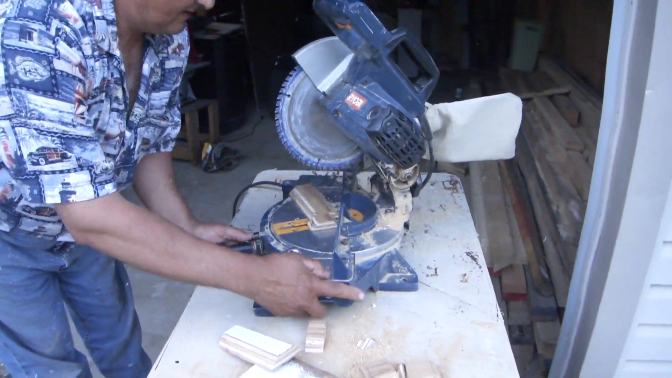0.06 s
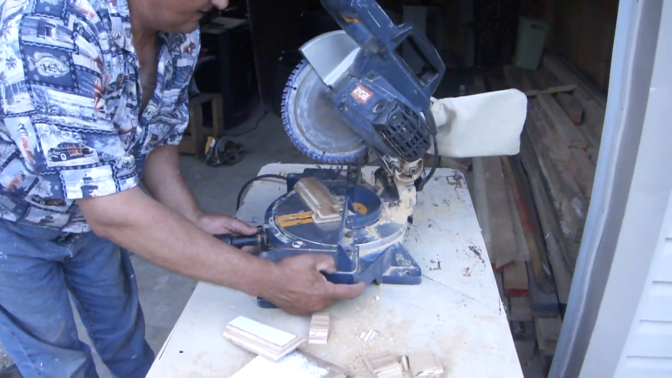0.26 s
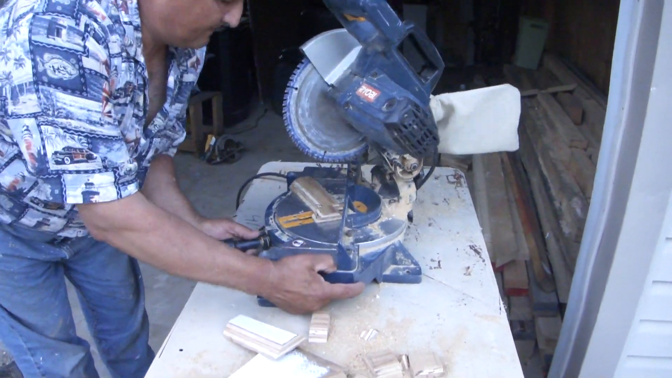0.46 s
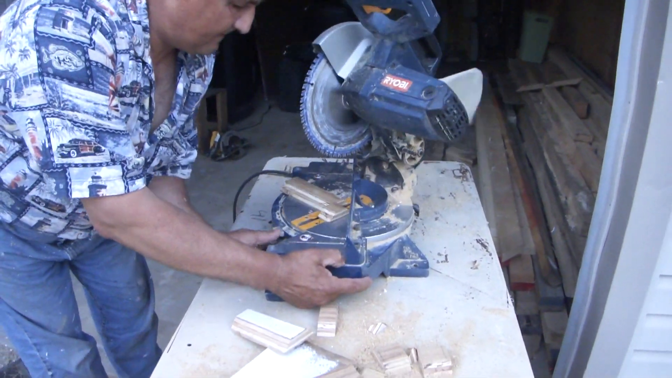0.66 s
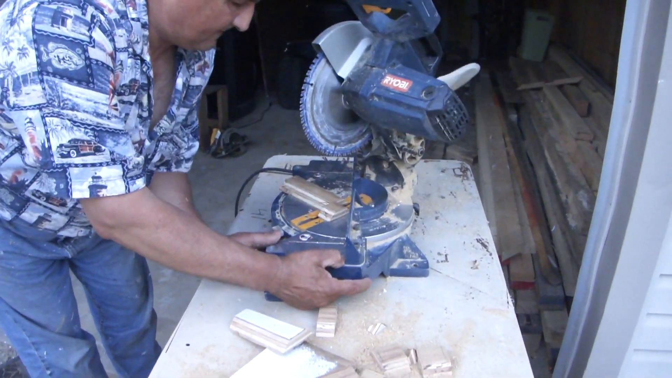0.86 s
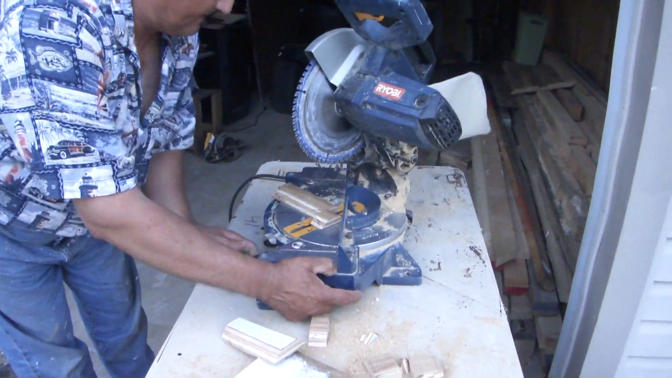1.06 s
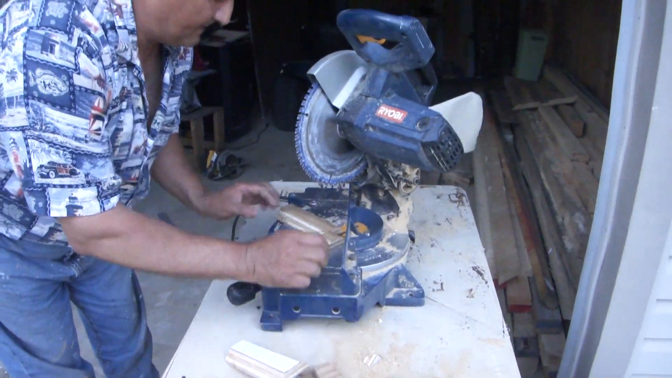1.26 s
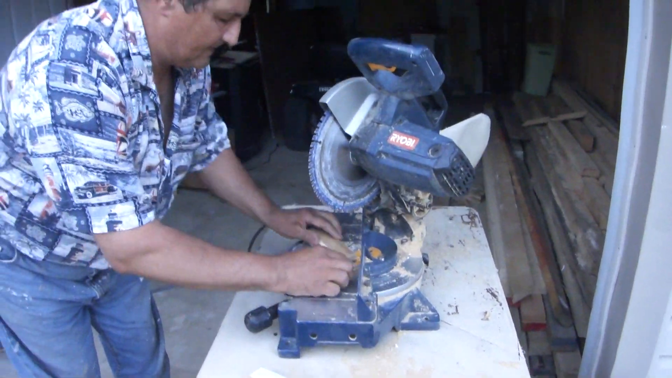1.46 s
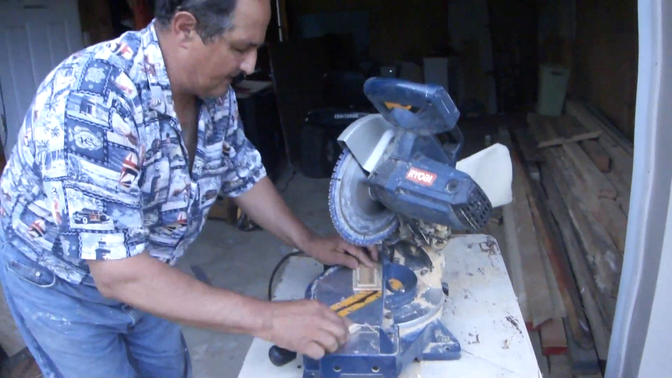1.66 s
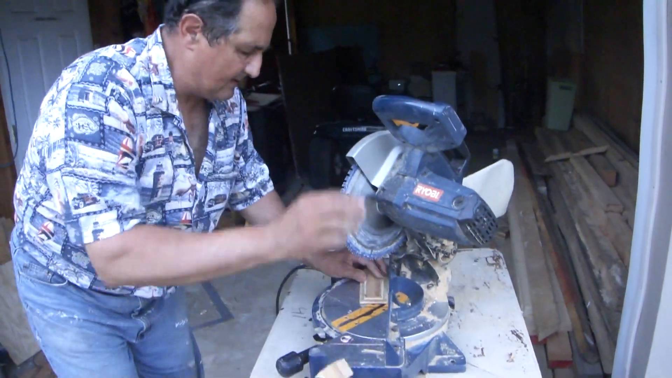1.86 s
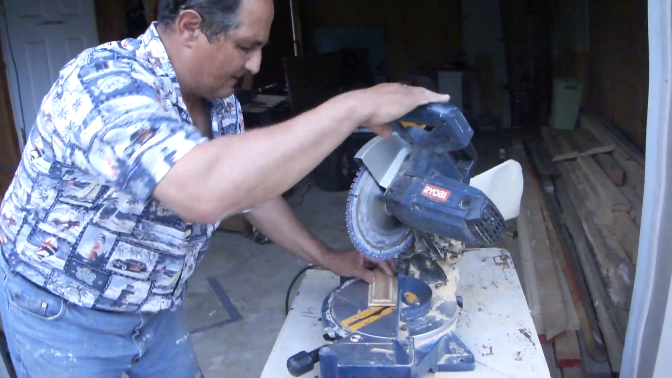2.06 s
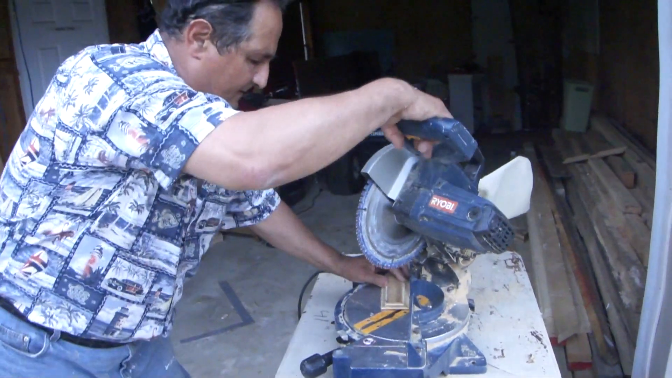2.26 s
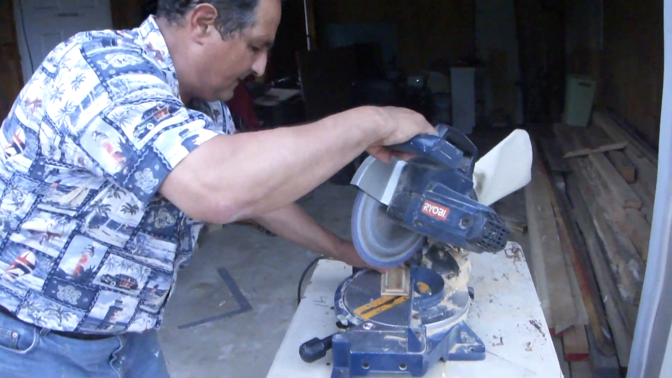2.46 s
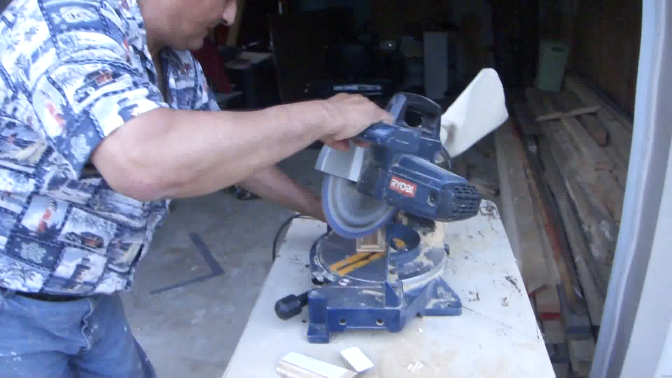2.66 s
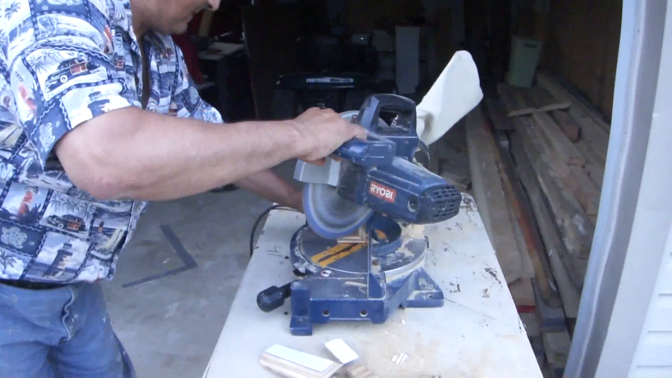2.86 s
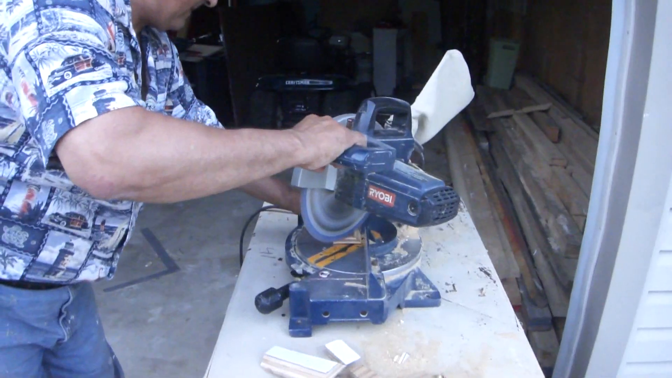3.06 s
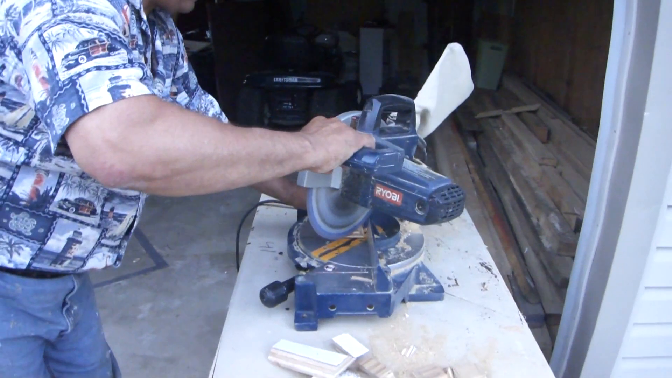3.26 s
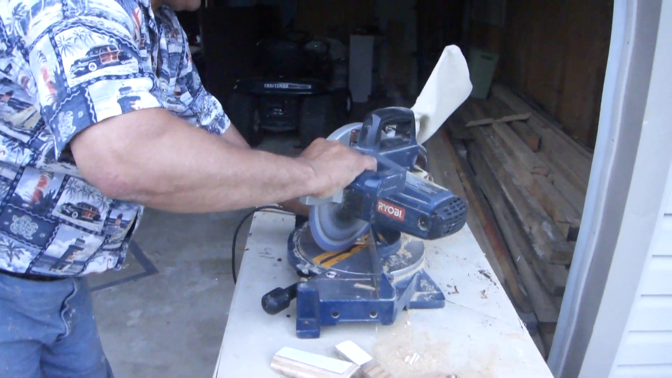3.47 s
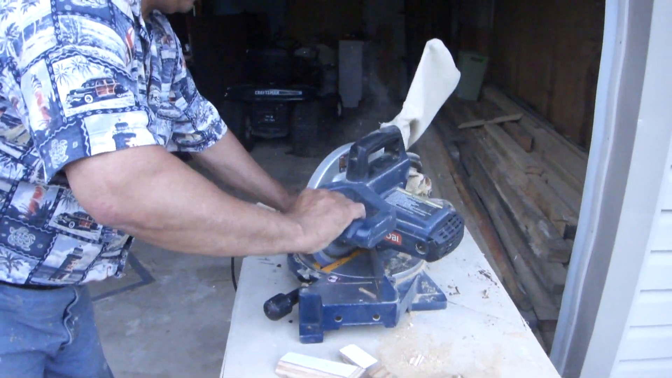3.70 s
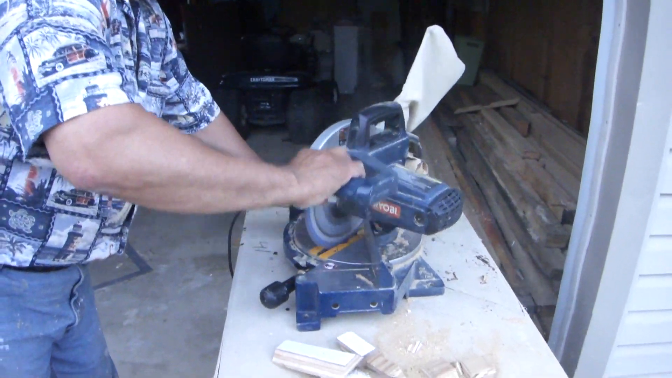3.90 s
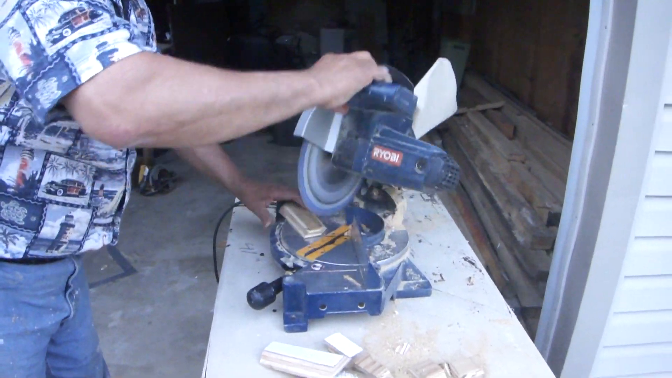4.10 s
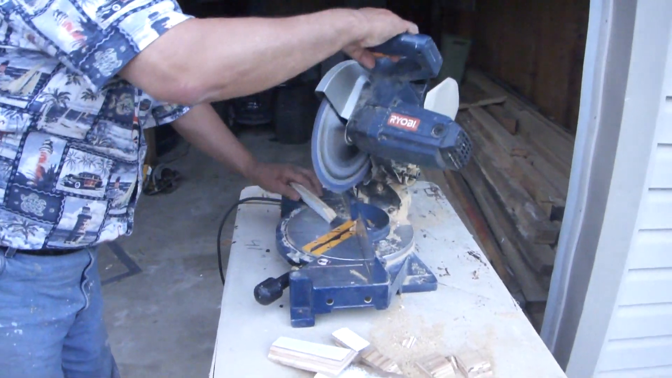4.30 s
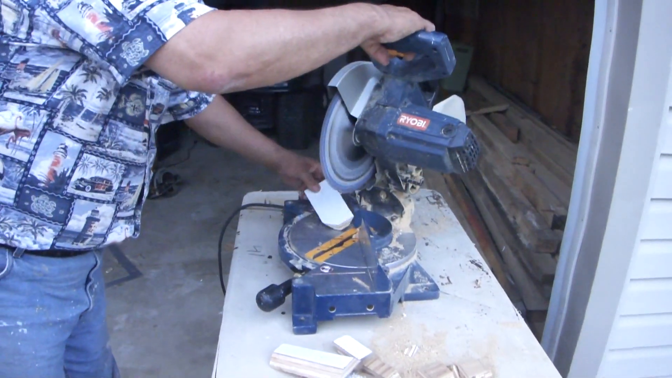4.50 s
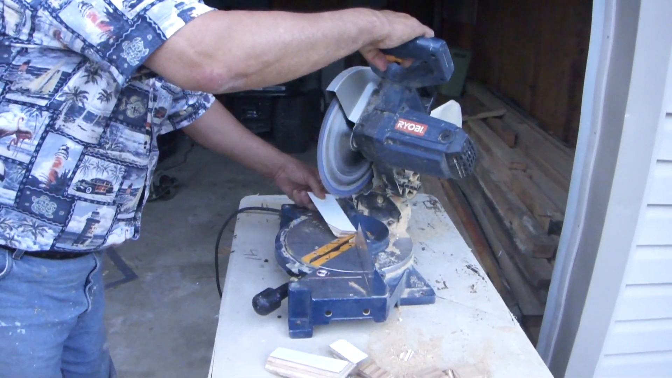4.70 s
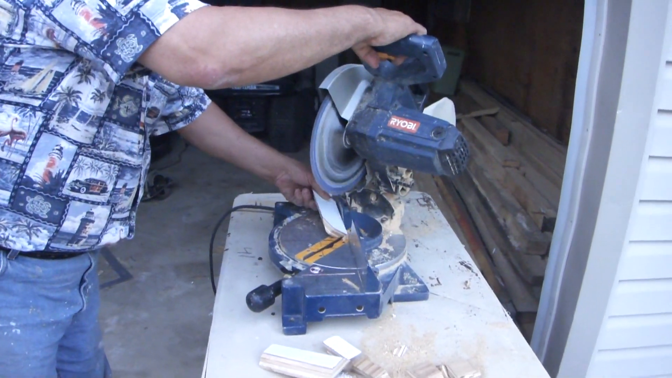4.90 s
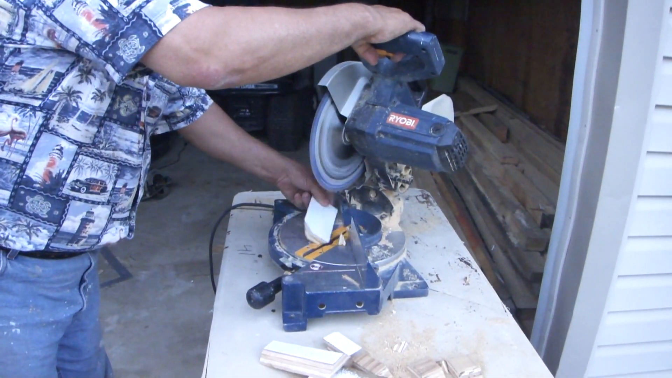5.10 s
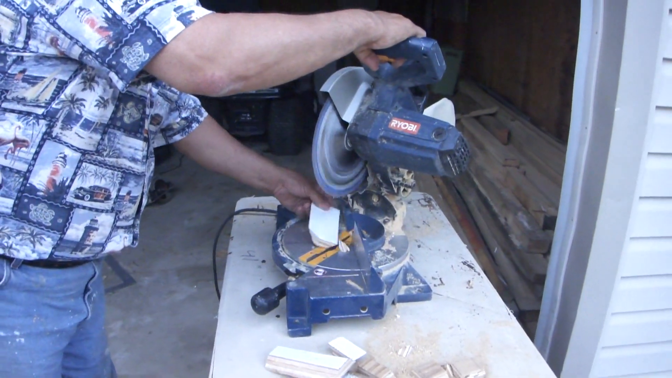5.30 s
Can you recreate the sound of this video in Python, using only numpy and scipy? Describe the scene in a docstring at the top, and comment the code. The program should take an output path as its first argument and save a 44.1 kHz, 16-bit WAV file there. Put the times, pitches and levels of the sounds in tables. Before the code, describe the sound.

Close by at a bench in an open garage, a miter saw's table scrapes round and clicks, and a wooden block is slid and knocked into place over a soft rush. The motor jolts on and whines up to speed, then the teeth rasp briefly through the wood. Switched off with a sharp click, the saw coasts down, its blade ringing with a slowing flutter, and the wood knocks once more.

```python
"""A soft workshop rush, then knocks and scrapes, close to a stereo pair at a bench in an open garage.
A miter saw's table is swung round and a wooden block is slid and knocked into place. The motor starts
with a jolt, gears and fan whine up to speed, and the teeth rasp through the block. Switched off, the saw
coasts down while its steel blade rings on with a slowing flutter. The recorder's gain control pushes
the room down under the saw and lets it back up as the saw slows."""
import sys
import numpy as np
from scipy import signal
from scipy.fft import rfft, irfft
from scipy.io import wavfile
from scipy.ndimage import uniform_filter1d

SR = 44100
rng = np.random.default_rng(int(sys.argv[2]) if len(sys.argv) > 2 else 0)


def dump(signal):
    """Clip the signal to [-1, 1] and save it as 16-bit WAV at the path in sys.argv[1]."""
    limited = np.clip(np.atleast_2d(signal).T, -1, 1)
    pcm = np.round(limited * 32767).astype(np.int16)
    wavfile.write(sys.argv[1], SR, pcm)


N = 235798
TIME = np.arange(N) / SR
GEAR_TEETH, PINION_TEETH, MAINS_HZ = 29, 8, 60
TOP_SPEED = 73.3  # blade turns per second
CATCH_S, SWITCH_ON_S, SWITCH_OFF_S = 0.7325, 2.468, 3.91
BITE_S, THROUGH_S = 3.41, 3.7  # the wood loads the motor between these times


def amp(db):
    """Decibels to gain."""
    return 10 ** (np.asarray(db) / 20)


def gate(start, end, fade):
    """One between two times, with straight fades outside them (all in s)."""
    return np.clip(np.minimum(TIME - start, end - TIME) / fade + 1, 0, 1)


def swell(peak_s, rise_db_per_s, fall_db_per_s):
    """Gain that climbs to one at a given time and dies away after it."""
    return amp(np.minimum((TIME - peak_s) * rise_db_per_s, (peak_s - TIME) * fall_db_per_s))


def bump(peak_s, width_s):
    """Bell curve of height one."""
    return np.exp(-((TIME - peak_s) / width_s) ** 2)


def unit(x):
    """Scale to rms 1."""
    return x / np.sqrt(np.mean(x ** 2))


def band(x, lo_hz, hi_hz):
    """Steep band-pass."""
    return signal.sosfilt(signal.butter(4, [lo_hz, hi_hz], "band", fs=SR, output="sos"), x)


def steady(x, lo_hz, hi_hz):
    """Scale so that the given band holds rms 1 from moment to moment."""
    power = uniform_filter1d(band(x, lo_hz, hi_hz) ** 2, size=4000)
    return x / np.sqrt(np.abs(power) + 1e-12)


def colour(x, spectrum, peaks=(), size=4096):
    """Causal filter from (f/Hz, level/dB) points plus (f/Hz, width/Hz, gain/dB) resonances."""
    f = np.fft.rfftfreq(size, 1 / SR) + 1
    hz, db = np.transpose(spectrum)
    db = np.interp(np.log(f), np.log(hz), db)
    db += sum(gain / (1 + (2 * (f - centre) / width) ** 2) for centre, width, gain in peaks)
    cepstrum = irfft(np.log(amp(db)))[:size // 2]
    cepstrum[1:] *= 2  # minimum phase
    return signal.fftconvolve(x, irfft(np.exp(rfft(cepstrum, size))))[:len(x)]


def walk(rate):
    """Smooth random wander of rms 1, taking `rate` steps a second."""
    hold = int(SR / rate)
    steps = np.repeat(rng.standard_normal(N // hold + 1), hold)
    return unit(uniform_filter1d(uniform_filter1d(steps, hold), hold)[:N])


def impacts(hits, spread_db):
    """An impulse of random size at each marked sample; rms 1 overall."""
    return unit(hits * rng.standard_normal(N) * amp(spread_db * rng.standard_normal(N)))


def grains(rate, spread_db=1):
    """Tiny impacts at random times, `rate` a second on average."""
    return impacts(rng.random(N) < rate / SR, spread_db)


def strikes(cycles, spread_db):
    """One impact at each whole cycle."""
    return impacts(np.diff(np.floor(cycles), prepend=0), spread_db)


def tones(turns, rough, flutter_hz, orders=((1, 0),)):
    """Overtones (multiple, level/dB) of a rotation; roughness (0-1) smears each into a narrow band."""
    out = 0
    for order, db in orders:
        flutter = (walk(flutter_hz) + 1j * walk(flutter_hz)) / np.sqrt(2)
        carrier = np.exp(2j * np.pi * (order * turns + rng.random()))
        out += amp(db) * np.real((np.sqrt(1 - rough ** 2) + rough * flutter) * carrier)
    return np.sqrt(2) * out


def workshop():
    """Room tone: a soft, steady rush with faint machine tones, nearly the same at both capsules."""
    # spectrum of the rush: f/Hz, level/dB
    room_spectrum = [(18, -21), (30, -24.5), (159, -4.5), (384, -10.5), (470, -5.5), (520, -10),
                     (620, -4.5), (778, -9), (929, -4), (1080, -8.5), (1320, -6), (2190, -15),
                     (3200, -19.5), (3820, -25.5), (12500, -41.5), (16200, -83), (22000, -120)]
    # machine tones: f/Hz, level/dB
    machines = [(167.3, -48.5), (597, -49), (120, -50.5)]
    mid, side = (unit(colour(rng.standard_normal(N), room_spectrum)) for _ in range(2))
    rush = mid * amp(0.08 * walk(7.1)) + 0.39 * side * np.array([[1], [-1]])
    hum = sum(amp(db) * tones(hz * TIME, rough=0.72, flutter_hz=12) for hz, db in machines)
    return amp(-34.5) * rush + hum


def garage(x, t60=0.32, early_t60=0.08, wet_db=-11, side_db=-15):
    """Bench and walls reflect: a short tail common to both capsules and early echoes that differ."""
    t = TIME[:SR // 2]
    tail, early = (rng.standard_normal(len(t)) * amp(-60 * t / decay) * (t > 0.003)
                   for decay in (t60, early_t60))
    tail = colour(tail, [(100, -1), (1500, 3.5), (5000, 1), (12000, 4.5)])
    tail /= np.sqrt(SR * t60 / np.log(1e6))  # divide out the decay's energy
    early /= np.linalg.norm(early)
    early = colour(early, [(100, 6), (2500, -10), (5000, 2), (8500, 8), (12000, 3)])
    mid = x + amp(wet_db) * signal.fftconvolve(x, tail)[:N]
    side = amp(side_db) * signal.fftconvolve(x, early)[:N]
    return mid + side * np.array([[1], [-1]])


def table_swing():
    """The gritty saw table sticks and slips as it creeps, runs free past its catch and comes to rest."""
    # spectrum of the scrape: f/Hz, level/dB
    scrape_spectrum = [(88, -44), (150, -11), (292, -11.5), (509, -3.5), (697, -17), (823, -2), (886, -4.5),
                       (1490, -7), (2000, -13.5), (2200, -9.5), (4040, -20), (10400, -28.5), (12500, -37),
                       (16200, -75), (22000, -120)]
    start_s = 0.577
    creep = amp(-29.5 + 15 * (TIME - start_s)) * gate(start_s, CATCH_S, fade=0.031)
    free_run = amp(-11.5) * swell(0.7577, rise_db_per_s=354, fall_db_per_s=199)
    grit = grains(rate=1800) + 0.5 * rng.standard_normal(N)
    scrape = colour(grit, scrape_spectrum, peaks=[(534, 140, 1.6), (800, 58, 3.3), (1490, 100, 5.7)])
    return unit(scrape) * np.hypot(creep, free_run)


def catch():
    """The table's steel catch snaps over a notch and rings briefly."""
    # modes of the catch: f/Hz, level/dB, t60/s
    modes = [(3220, -7.5, 0.034), (3580, -14, .03), (5020, -11.5, 0.03), (7500, -35, 0.022)]
    t = np.maximum(TIME - CATCH_S, 0)
    return sum(amp(db - 60 * t / t60) * np.sin(2 * np.pi * hz * t) for hz, db, t60 in modes)


def block_slide(release_db_per_s=167):
    """Wood fibres hiss and squeak on the table as the block is slid to the fence."""
    # pushes of the block: t/s, length/s, level/dB
    pushes = [(1.107, 0.13, -39.5), (1.538, 0.018, -38), (1.604, 0.18, -37), (2.146, 0.016, -35)]
    # spectrum of the sliding wood: f/Hz, level/dB
    hiss_spectrum = [(710, -39), (1200, 1), (2930, -4), (4010, -11.5), (4740, -7), (5430, -10),
                     (7290, -6.5), (9690, -13), (12500, -22), (16200, -57), (22000, -120)]
    # squeaks of the wood: t/s, f/Hz, level/dB
    squeaks = [(1.548, 9950, -46), (1.71, 7340, -35), (1.775, 9700, -38.5)]
    motion = 0
    for s, length, db in pushes:
        release_db = release_db_per_s * np.maximum(TIME - s - length, 0)
        motion += amp(db - release_db) * gate(s, np.inf, fade=0.014)
    fibres = grains(rate=2200, spread_db=2) * amp(3.2 * walk(59.7))
    resonances = [(2060, 180, 3.5), (5040, 250, 4.2), (7370, 400, 3), (9900, 410, 2.8)]
    out = unit(colour(fibres, hiss_spectrum, resonances)) * motion
    for s, hz, db in squeaks:
        out += amp(db) * bump(s, width_s=0.012) * tones(hz * TIME, rough=0.95, flutter_hz=600)
    return out


def knocks(crack_t60=0.042, tick_t60=0.017, thud_trim_db=3, tick_trim_db=-2):
    """Each blow rings the block's modes, with a short crack and a bright tick at the contact."""
    # blows of wood and saw parts: t/s, thud/dB before trim, crack/dB, tick/dB before trim, pitch factor
    blows = [(0.09, -28, -48, -33.5, 0.78), (.504, -25.5, -26, -46, 0.77), (.664, -22, -26, -44, 1.27),
             (.733, -13, -19, -4.5, 1.4), (.757, -18, -13, -32, 1.2), (0.821, -10, -18, -43, 1.5),
             (.856, -20.5, -19, -47, 0.83), (1.1356, -11, -7.5, -40, 1.08), (1.215, -22, -28, -41, 0.92),
             (1.237, -24, -24.5, -30, 1.05), (1.522, -25.5, -30, -26.5, .8),
             (2.0648, -4.5, -7.5, -25, 0.85), (2.156, -9.5, -18, -22.5, 0.81),
             (2.173, -13.5, -24, -25, 0.99), (2.3502, -11.5, -23, -40, 0.88), (2.471, -11, -23, -10, 1.17),
             (2.48, -11, -11, -24, 1.01), (3.912, -8, -10, 2.5, 1), (4.676, -3, -7.5, -13, 1.76)]
    # modes of the block on the saw table: f/Hz, level/dB, t60/s
    modes = [(266.6, -9, 0.15), (398.5, -3.5, 0.15), (523, -2, .17), (607, -1.5, 0.18), (704, 4.5, 0.074),
             (838, 1, 0.083), (960, 3.5, 0.066), (1155, -3.5, 0.11), (1385, -6.5, 0.06)]
    # spectra of the contact: f/Hz, level/dB
    crack_spectrum = [(40, -34), (300, -2.5), (900, 6.5), (1900, 3.5), (3200, -8.5), (5000, -20),
                      (8000, -29.5), (12000, -44)]
    tick_spectrum = [(100, -60), (1500, -34), (3400, 1.5), (5000, 5.5), (7500, -7), (10000, -2),
                     (12500, -23)]
    out = np.zeros(N + SR)
    t = TIME[:SR // 3]
    for s, thud_db, crack_db, tick_db, pitch in blows:
        tuning = pitch * (1 + 0.021 * rng.standard_normal(len(modes)))
        thud = sum((-1) ** k * amp(db - 60 * t / t60) * np.sin(2 * np.pi * hz * tuning[k] * t)
                   for k, (hz, db, t60) in enumerate(modes))
        crack = unit(colour(rng.standard_normal(len(t)), crack_spectrum))
        tick = unit(colour(rng.standard_normal(len(t)), tick_spectrum))
        hit = thud / np.abs(thud).max() * amp(thud_db + thud_trim_db)
        hit += crack * amp(crack_db - 60 * t / crack_t60)
        hit += tick * amp(tick_db + tick_trim_db - 60 * t / tick_t60)
        start = int(s * SR)
        out[start:start + len(t)] += hit
    return band(out[:N], 102, 15000)


def blade_speed(spin_up_goal=81, spin_up_s=0.407, coast_goal=5.9, coast_s=0.358):
    """Turns per second: an exponential run-up, a slight sag in the wood, an exponential run-down."""
    rising = spin_up_goal * (1 - np.exp(-np.maximum(TIME - SWITCH_ON_S, 0) / spin_up_s))
    sag = 2.6 * gate(3.48, 3.58, fade=0.2)
    falling = coast_goal + (TOP_SPEED - coast_goal) * np.exp((SWITCH_OFF_S - TIME) / coast_s)
    return np.where(TIME < SWITCH_OFF_S, np.minimum(rising, TOP_SPEED) - sag, falling)


def motor_hum(run_up, jolt):
    """The motor hums at twice the mains frequency, loudest as it starts."""
    orders = [(1, -1.5), (2, -1), (3, -6), (4, -2), (5, -9)]
    hum = tones(2 * MAINS_HZ * TIME, rough=0.4, flutter_hz=25, orders=orders)
    return hum * amp(-55 + 13.5 * run_up + 8 * jolt)


def gear_ticking(turns, pace, powered):
    """Unloaded teeth tick evenly; each overtone flares as it slides through a housing resonance."""
    ticks = tones(turns * GEAR_TEETH, rough=0.73, flutter_hz=60, orders=[(k, 0) for k in range(2, 21)])
    spectrum = [(400, -17.5), (800, 1.5), (2400, 8.5), (3800, -9), (8000, -10.5), (12000, -14)]
    ticks = colour(ticks, spectrum, peaks=[(882, 290, 13.7), (4670, 190, 18)])
    coasting = (1 - powered) * (TIME > SWITCH_OFF_S)
    return unit(ticks * coasting) * amp(-12 + 20.5 * pace)


def gear_clatter(turns, armature, pace, powered, run_up, jolt, load):
    """Gear teeth clash and brushes fizz in the housing: a low growl under a bright rattle."""
    # spectra of the drive, under power and coasting: f/Hz, level/dB
    driven_spectrum = [(88, -50), (150, -41), (234, -17.5), (303, -25), (358, -17), (472, -9.5), (672, -9),
                       (839, -12.5), (991, -6), (1410, -6), (1890, -4.5), (3550, -8.5), (4200, -12.5),
                       (10800, -23), (12500, -29), (16200, -93), (22000, -120)]
    coasting_spectrum = [(88, -53), (150, -39.5), (351, -24), (464, -16.5), (737, -19), (991, -11.5),
                         (1260, -15), (1690, -10), (2690, -13.5), (3010, -10), (3750, -16), (4600, -16.5),
                         (6790, -22.5), (8170, -21), (12500, -35), (16200, -83), (22000, -120)]
    # resonances of the housing: f/Hz, width/Hz, gain/dB
    housing = [(490, 78, 1), (700, 107, -8.5), (835, 51, 10.5), (1020, 100, 2), (4590, 130, 8.5),
               (7880, 630, 3)]
    brushes = grains(rate=9000) * (1 + 0.11 * np.cos(2 * np.pi * armature))
    clatter = 0.53 * strikes(turns * GEAR_TEETH, spread_db=2) + brushes
    driven = steady(colour(clatter, driven_spectrum, housing), 1590, 2640)
    coasting = steady(colour(clatter, coasting_spectrum, housing), 1590, 2640)
    body = powered * driven + (1 - powered) * coasting
    # the gears hammer under the starting torque, harder as they gather speed
    hammering = jolt * amp(7.5 * (TIME - SWITCH_ON_S))
    growl_gain = np.hypot(amp(-19.5 + 5.5 * pace + 5 * run_up), amp(-15.5) * hammering)
    rattle_gain = np.hypot(amp(-11 + 19 * pace - 6 * load), amp(-21) * hammering)
    growl = steady(band(body, 120, 1350), 300, 1650)
    return growl * growl_gain + band(body, 1684, 12600) * rattle_gain


def whine(armature, pace, powered, jolt, load, brake_end_s=4.33):
    """Gear mesh and fan whine, rougher under power; more overtones sing as the brake loads the teeth."""
    # overtones of gear mesh, cooling fan and braked teeth: multiple of the armature speed, level/dB
    mesh_orders = [(7, -16), (8, -0.5), (9, -11), (10, -21.5), (16, -12), (23, -16), (24, -17)]
    fan_orders = [(12, -18), (13, -10), (14, -3.5), (15, -4), (16, -9), (28, -15)]
    brake_orders = [(13, -15), (16, -11), (23, -14), (24, -8), (28, -16), (32, -15)]
    braking = (1 - powered) * gate(BITE_S, brake_end_s, fade=0.07)
    rough = 0.95 * powered + 0.36 * (1 - powered)
    mesh = tones(armature, rough, flutter_hz=260, orders=mesh_orders)
    fan = tones(armature, rough, flutter_hz=300, orders=fan_orders)
    mesh += braking * tones(armature, rough=0.62, flutter_hz=70, orders=brake_orders)
    mesh *= amp(-10.5 + 31.5 * pace + 4.5 * jolt + 7 * braking)
    fan *= amp(-9.5 + 36 * pace - 5 * load + 1.5 * braking)
    casing_peaks = [(855, 43, 8.5), (1104, 130, 7.5), (1215, 72, -9),
                    (1640, 67, 1), (1920, 140, 4), (2780, 790, 8.5)]
    return colour(mesh + fan, [(3900, -1), (5200, -1.5), (9000, 0)], casing_peaks)


def drive(turns, speed, jolt_end_s=2.79, throb_depth=0.15):
    """Motor and gearbox grow louder with speed; under power, clatter and whine throb with the mains."""
    powered = gate(SWITCH_ON_S, SWITCH_OFF_S, fade=0.0061)
    jolt = gate(0, jolt_end_s, fade=0.15)
    run_up = gate(0, BITE_S - 0.07, fade=0.055)
    load = gate(BITE_S, THROUGH_S, fade=0.07)
    pace = np.log10(np.maximum(speed, 1) / TOP_SPEED)  # 0 at top speed, -1 at a tenth of it
    armature = turns * GEAR_TEETH / PINION_TEETH
    running = gear_clatter(turns, armature, pace, powered, run_up, jolt, load)
    running += whine(armature, pace, powered, jolt, load)
    running *= gate(SWITCH_ON_S + 0.002, np.inf, fade=0.003)
    throb = 1 + powered * throb_depth * np.cos(2 * np.pi * MAINS_HZ * TIME)
    return running * throb + gear_ticking(turns, pace, powered) + powered * motor_hum(run_up, jolt)


def blade_ring(turns):
    """The disc's lobes sweep past, splitting each mode into lines that beat and close up as it slows."""
    # lines of the blade's modes: f/Hz at rest, shift in multiples of the blade speed, level/dB
    lines = [(2930, -10, -2), (2930, -6, -6), (2930, -2, -4), (2930, 2, 0), (2930, 6, 0), (2930, 10, -4),
             (2930, 14, -11), (3150, -12, -12), (3150, -8, -6), (3150, -4, -2), (3150, 4, -2),
             (3150, 8, -9), (3150, 12, -9), (3260, 6, -10)]
    ring = 0
    for hz, lobes, db in lines:
        phase = 2 * np.pi * (hz * TIME + lobes * turns) + 0.021 * lobes ** 2
        ring += amp(db) * np.cos(phase + 0.12 * walk(10))
    # only lines near the disc's main resonance carry well
    ring = colour(ring, [(2000, -30), (2600, -12), (2780, 0), (3450, 0), (3650, -12), (4500, -24)])
    # the ringing builds while the saw brakes, then dies away
    envelope = swell(4.334, rise_db_per_s=11, fall_db_per_s=6.5) * gate(3.78, np.inf, fade=0.11)
    return amp(-8.5) * steady(ring, 2000, 4500) * envelope


def cut(turns, tooth_count=24, flare_db=9):
    """Teeth tear the fibres and set the high blade modes screaming, each strongest at its own depth."""
    # how hard the blade is pressed into the block: t/s, level/dB
    feed = [(3.33, -11), (3.37, 2), (3.45, -4), (3.51, 1.5), (3.62, 1), (3.72, 3), (3.79, -8.5)]
    # spectrum of the tearing wood: f/Hz, level/dB
    rasp_spectrum = [(1470, -42), (2500, -9), (3150, -6.5), (3580, -3), (3890, -7), (5100, 0), (6390, -2),
                     (7570, -3), (8330, -6), (10600, -2), (12700, -11), (16500, -43), (22000, -120)]
    # screaming blade modes: f/Hz, level/dB, t/s when strongest
    modes = [(4220, -35.5, 3.69), (4630, -40, 3.55), (4860, -33, 3.38), (4860, -33.5, 3.44),
             (5230, -34, 3.5), (5320, -30, 3.72), (5797, -37, 3.6), (6140, -37, 3.5), (6360, -31.5, 3.58),
             (6550, -34.5, 3.66), (6970, -39, 3.4), (7110, -34, 3.62), (8210, -29, 3.38), (8700, -37, 3.55),
             (8500, -30, 3.69), (9310, -30, 3.72), (9650, -44, 3.5), (10000, -37, 3.73),
             (10300, -31.5, 3.73), (10100, -38, 3.45), (10400, -35.5, 3.6), (11700, -35.5, 3.59)]
    bites = 0.5 * strikes(turns * tooth_count, spread_db=7) + grains(rate=13000)
    bites *= 1 + 0.14 * np.cos(2 * np.pi * turns)
    rasp = steady(colour(bites, rasp_spectrum), 4000, 13000)
    scream = 0
    for hz, db, s in modes:
        gain = amp(db + flare_db * bump(s, width_s=0.075))
        scream += gain * tones(hz * TIME, rough=0.93, flutter_hz=80)
    sawing = amp(-3) * rasp + amp(-1) * steady(scream, 4000, 12000)
    breakout_db = 8.5 * bump(3.75, width_s=0.12)  # the screech flares as the teeth break through
    tearing = steady(band(sawing, 2330, 7360), 3800, 8000) * amp(-4)
    screech = steady(band(sawing, 8000, 13300), 6900, 13500) * amp(-8.5 + breakout_db)
    feed_db = np.interp(TIME, *np.transpose(feed))
    return (tearing + screech) * amp(feed_db) * gate(3.345, 3.8, fade=0.068)


def gain_control(x, target_db=-16, attack_s=0.14, release_db_per_s=16.5, sense_s=0.02, hop=128):
    """The recorder's gain sinks while the sound is over its set level and creeps back as it falls."""
    step_s = hop / SR
    memory = np.exp(-step_s / sense_s)
    power = uniform_filter1d(np.mean(x ** 2, axis=0), size=hop)[::hop]
    power = signal.lfilter([1 - memory], [1, -memory], power)
    level_db = 10 * np.log10(np.abs(power) + 1e-12)
    cuts_db = [0]
    for over_db in np.maximum(level_db - target_db, 0):
        gap_db = over_db - cuts_db[-1]
        move_db = gap_db * step_s / attack_s if gap_db > 0 else max(gap_db, -release_db_per_s * step_s)
        cuts_db.append(cuts_db[-1] + move_db)
    return x * amp(-np.interp(TIME, TIME[::hop], cuts_db[1:]))


def scene():
    """Handling at the bench, then the saw, with the garage's reflections and room tone behind."""
    speed = blade_speed()
    turns = np.cumsum(speed) / SR
    handling = knocks() + catch() + table_swing() + block_slide()
    saw = drive(turns, speed) + blade_ring(turns) + cut(turns)
    return garage(handling + saw) + workshop()


def record(dry):
    """The right capsule is a little hotter; the gain rides, peaks clip, rumble and top treble are cut."""
    capsules = [colour(x, [(3000, sign * 1.11), (10000, sign * 1.35)]) for x, sign in zip(dry, (-1, 1))]
    clipped = np.clip(gain_control(np.array(capsules)), -1, 1)
    highpass = signal.butter(2, 70.6, "high", fs=SR, output="sos")
    lowpass = signal.ellip(10, 0.2, 70, 12500, fs=SR, output="sos")
    return signal.sosfilt(lowpass, signal.sosfilt(highpass, clipped))


dry = scene()
out = record(dry)
dump(out)
```